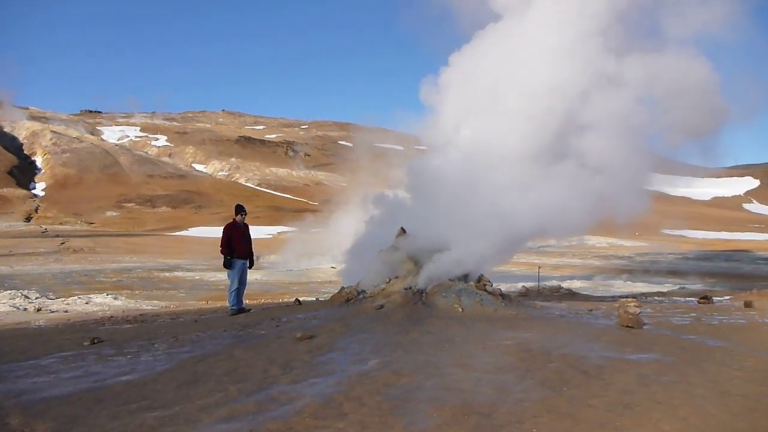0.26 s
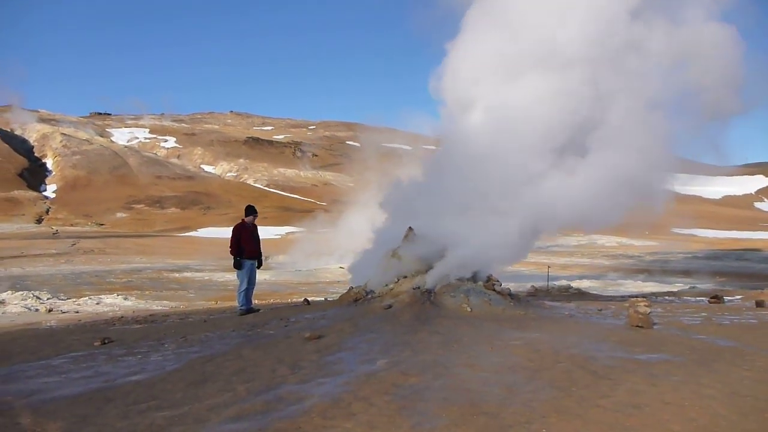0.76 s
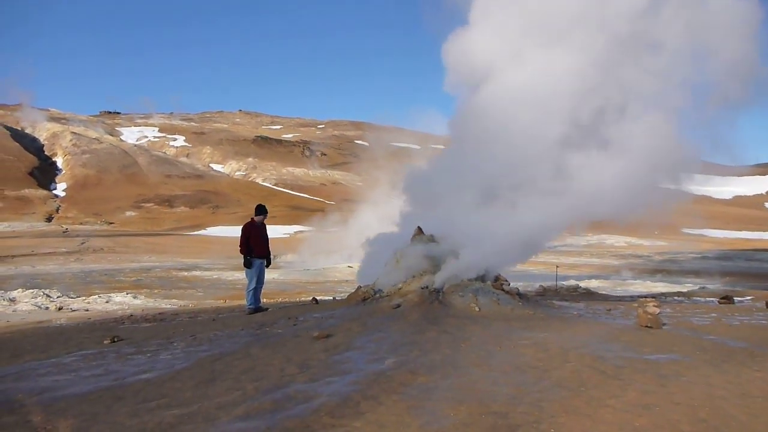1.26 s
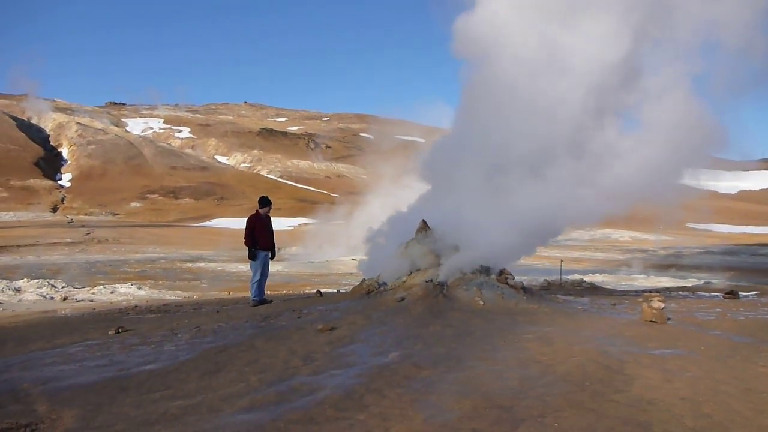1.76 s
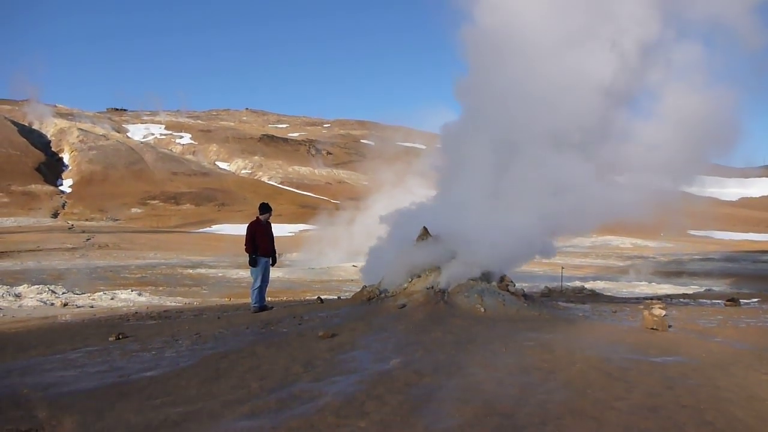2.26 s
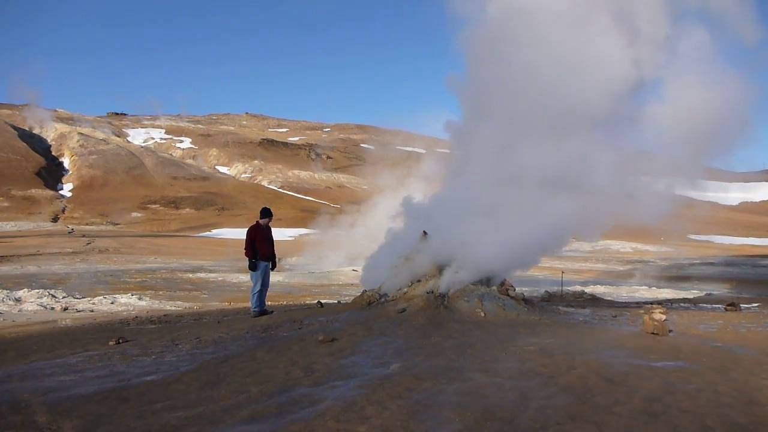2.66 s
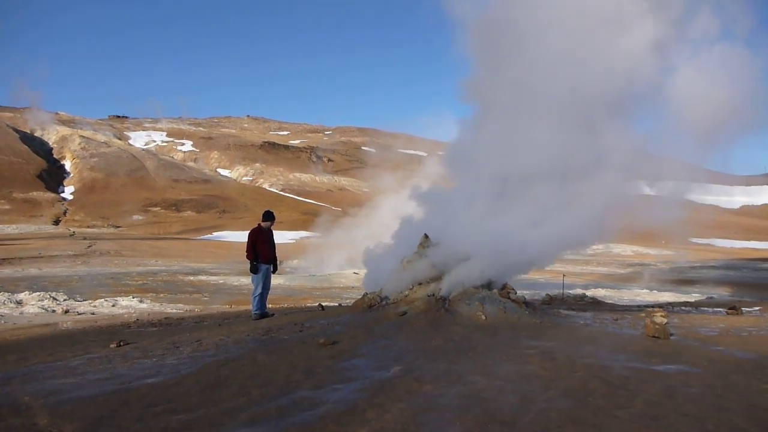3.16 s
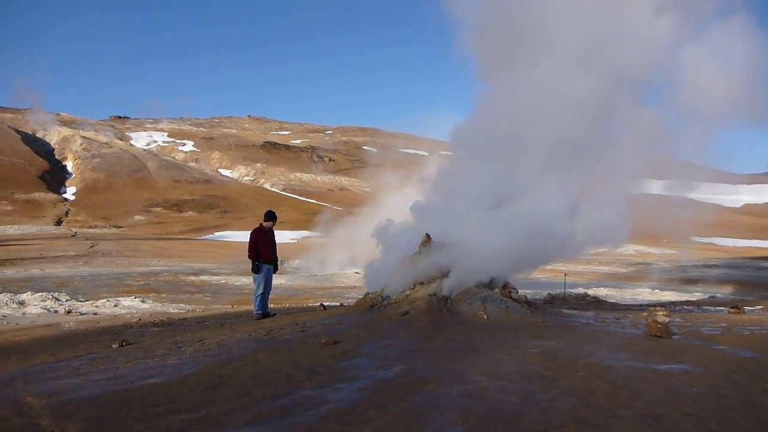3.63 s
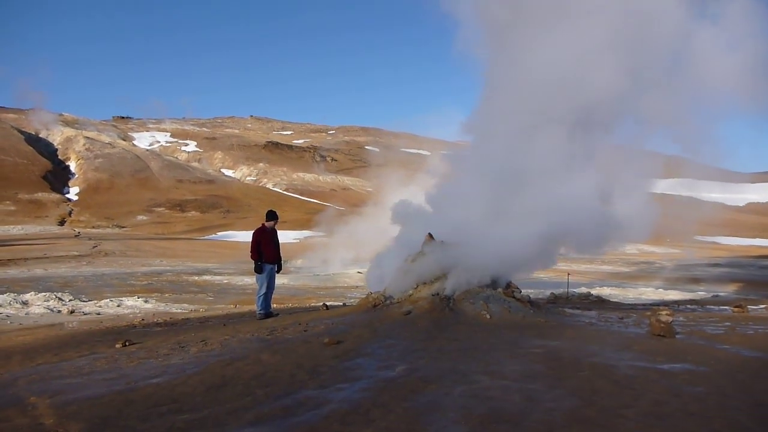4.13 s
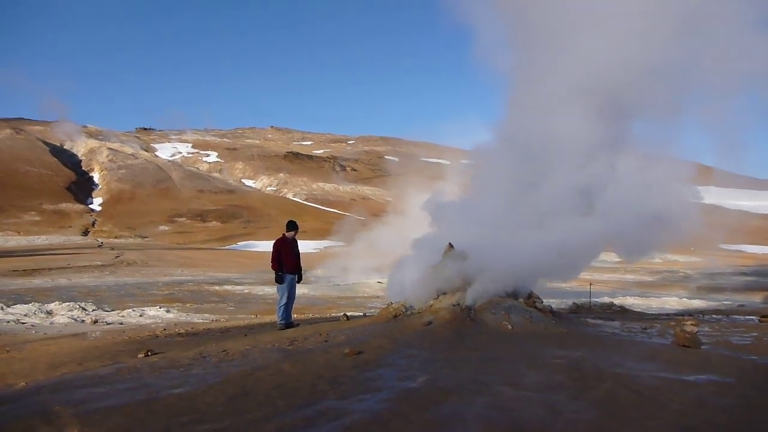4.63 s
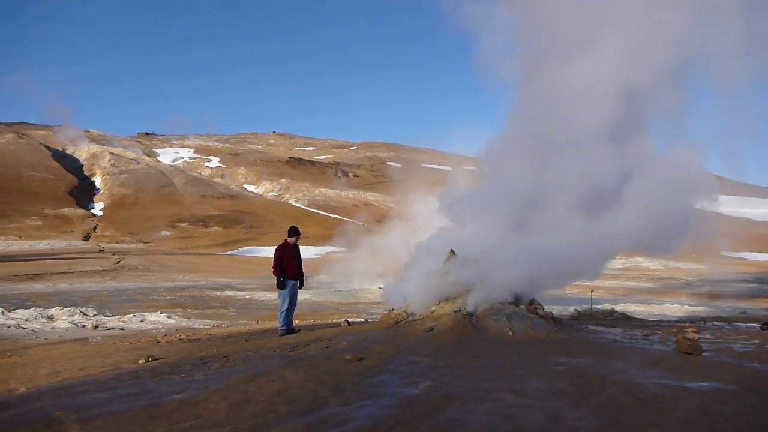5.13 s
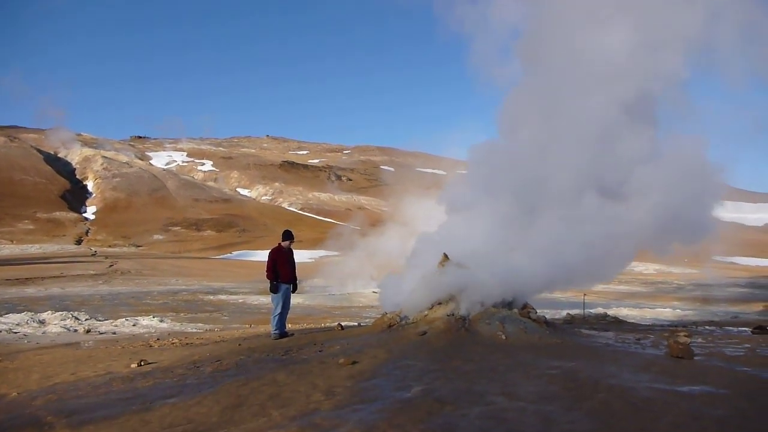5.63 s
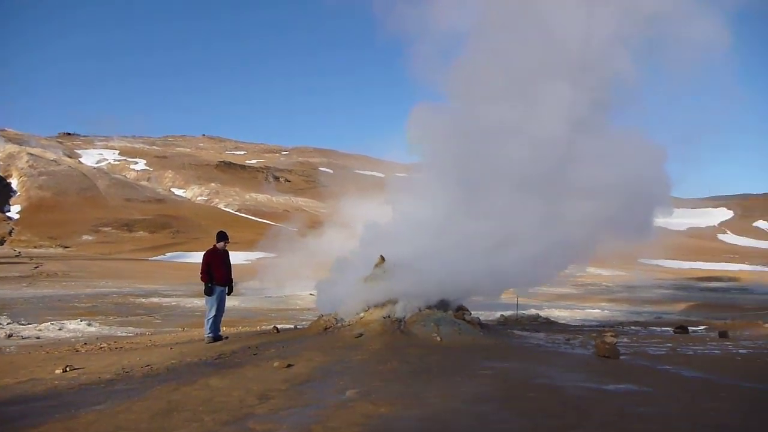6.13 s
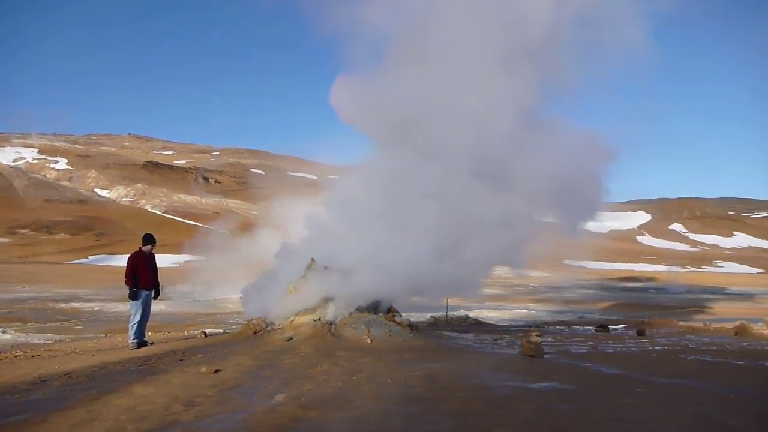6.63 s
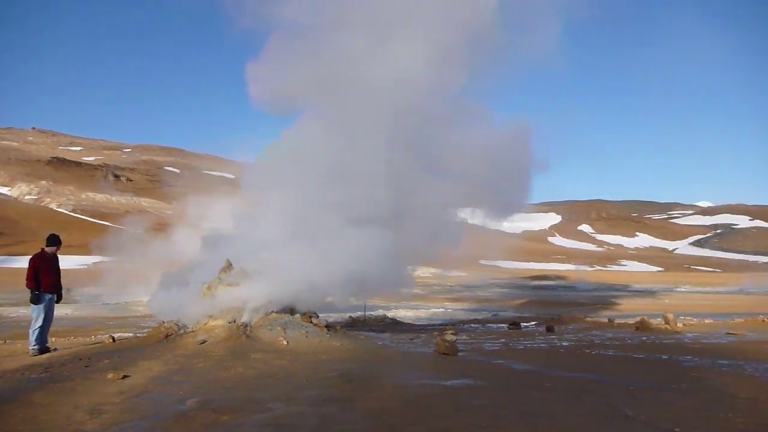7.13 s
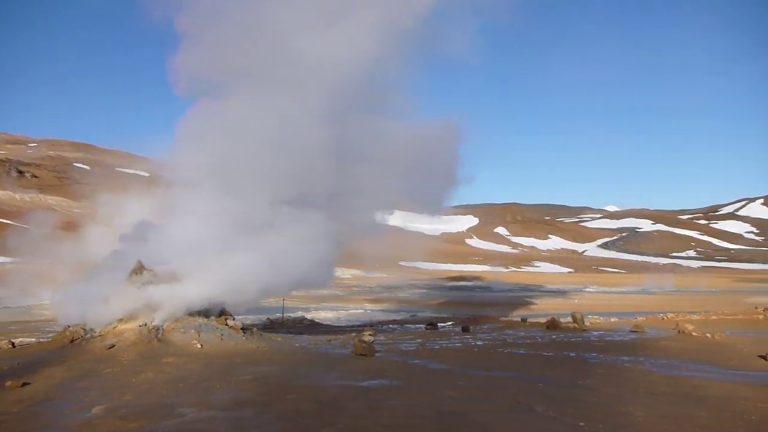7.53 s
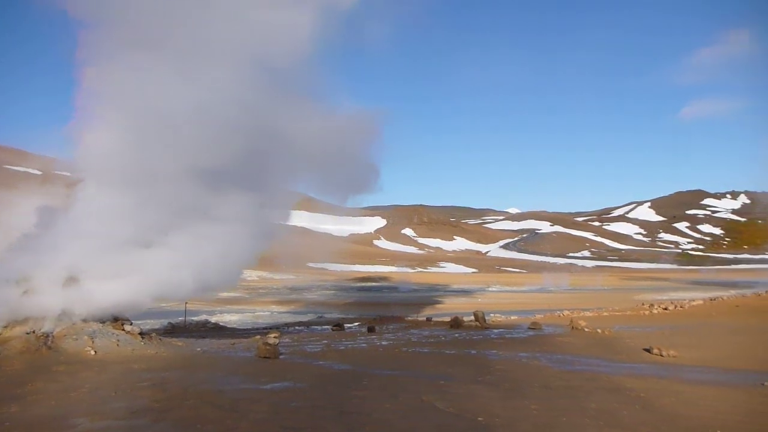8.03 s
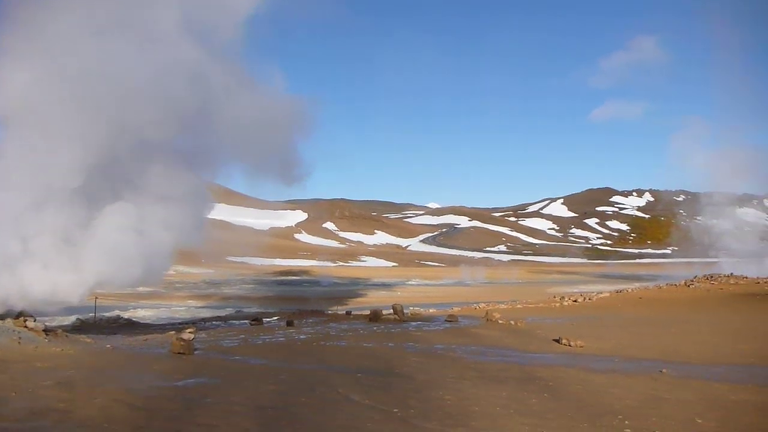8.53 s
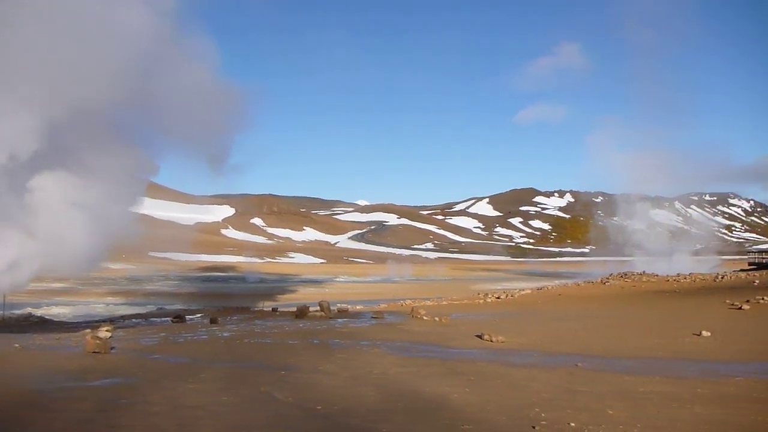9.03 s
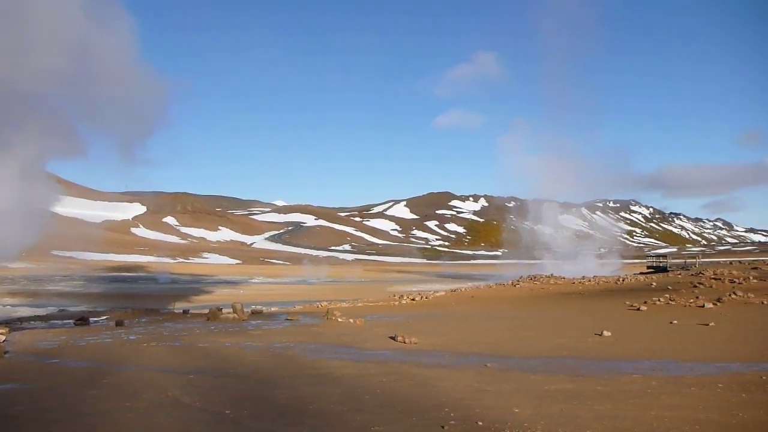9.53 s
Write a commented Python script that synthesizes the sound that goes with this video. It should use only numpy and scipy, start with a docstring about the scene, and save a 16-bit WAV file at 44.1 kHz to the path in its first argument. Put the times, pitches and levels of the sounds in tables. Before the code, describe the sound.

Steam roars steadily from a heap of stones in an open field, some metres from a hand-held microphone. The rushing hiss has a hollow body and swells faintly now and then. A tiny whistle sounds just after the start. In the second half the hiss shifts slightly in tone as the microphone turns away, and there is one small handling tick. Nothing echoes.

```python
"""Steam vent in an open field

Steam roars steadily from a heap of stones, some metres from a hand-held camera; nothing echoes.
The turbulent jet hisses, whistles once, and rings the hollow under the heap and its narrow throat.
Late on the camera turns away, which recolours the treble, and its body ticks once in the hand."""
import sys
import numpy as np
from scipy import signal
from scipy.fft import rfft, irfft
from scipy.io import wavfile
from scipy.ndimage import uniform_filter1d

SR = 44100
rng = np.random.default_rng(int(sys.argv[2]) if len(sys.argv) > 2 else 0)


def put_to_file(sound):
    """Save the sound as 16-bit audio at rate SR, in the file named by the first command-line argument."""
    columns = np.atleast_2d(sound).T  # one column per channel
    safe = np.clip(columns, -1, 1)
    whole_steps = np.round(safe * 32767)
    wavfile.write(sys.argv[1], SR, whole_steps.astype(np.int16))


N = 431298
TIME_S = np.arange(N) / SR
FREQ_HZ = np.fft.rfftfreq(N, 1 / SR)


def undb(db):
    """Decibels to gain."""
    return 10 ** (np.asarray(db) / 20)


def colour(points, hz):
    """Gain at hz of (frequency [Hz], level [dB]) points joined on a log-frequency axis."""
    points_hz, points_db = np.transpose(points)
    return undb(np.interp(np.log(hz + 1e-9), np.log(points_hz), points_db))


def resonance(centre_hz, width_hz):
    """Gain spectrum of a flat-topped, steep-sided resonance."""
    detune = (FREQ_HZ ** 2 - centre_hz ** 2) / (FREQ_HZ * width_hz + 1e-9)
    return 1 / np.hypot(1, detune ** 2)


def turbulence(spectrum, steady_s):
    """Shaped noise, rms held near 1 over spans of steady_s."""
    noise = irfft(rfft(rng.standard_normal(N)) * spectrum, N)
    return noise / np.sqrt(uniform_filter1d(noise ** 2, int(steady_s * SR)))


def wander(rate_hz):
    """Random values at rate_hz, linearly joined; zero mean, unit spread."""
    drift = np.interp(TIME_S * rate_hz, np.arange(N), rng.standard_normal(N))
    return (drift - drift.mean()) / drift.std()


# Mixing noise of the free jet: (frequency [Hz], relative density [dB])
JET_SPECTRUM = [(30, -37), (60, -22.5), (110, -3), (155, 1.5), (325, -1), (415, -7.5), (485, -1.5),
                (860, 1.5), (1120, -1.5), (1380, 0.3), (1620, -2.5), (1920, -3), (2620, -7), (2800, -13.5),
                (3300, -16), (4200, -19.5), (5800, -33), (7000, -45.5), (7600, -57.5)]


def vent(surge_rate_hz=5, steady_s=0.2):
    """Constant flow with small random surges: the jet and the two resonances it drives."""
    jet = colour(JET_SPECTRUM, FREQ_HZ)
    hollow = resonance(centre_hz=238, width_hz=144)
    throat = resonance(centre_hz=592, width_hz=221)
    turn_steps = bearing(TIME_S)

    def flow(spectrum, level_db, surge_db, db_per_step):
        db = level_db + surge_db * wander(surge_rate_hz) + db_per_step * turn_steps
        return undb(db) * turbulence(spectrum, steady_s)

    return (flow(jet, level_db=-26.5, surge_db=0.22, db_per_step=-0.12)
            + flow(hollow, level_db=-28.6, surge_db=0.14, db_per_step=0.05)
            + flow(throat, level_db=-29.5, surge_db=0.4, db_per_step=-0.22))


def bell(peak_s, half_s):
    """Gaussian envelope, down to 1/e at half_s from its peak."""
    return np.exp(-((TIME_S - peak_s) / half_s) ** 2)


# Edge tone: (time [s], frequency [Hz], half length [s], level [dB])
WHISTLES = [(0.227, 978, 0.021, -23.5)]


def whistles():
    """Steam catches on an edge of the mouth and sings for an instant."""
    return sum(undb(db) * bell(peak_s, half_s) * np.sin(2 * np.pi * hz * TIME_S)
               for peak_s, hz, half_s, db in WHISTLES)


# Resonant swells: (time [s], centre [Hz], width [Hz], half length [s], level [dB])
SWELLS = [ (0.68, 622, 30, 0.098, -35), (1.6, 256, 45, 0.17, -31.5), (2.92, 595, 65, 0.13, -29.5),
          (3.0, 1500, 700, 0.4, -40), (3.72, 560, 35, 0.08, -35), (5.552, 242, 40, 0.13, -34),
          (6.253, 246, 50, 0.14, -33.5), (7.02, 562, 24, 0.22, -31.5), (8.0, 600, 40, 0.28, -33),
          (8.12, 235, 40, 0.22, -33), (8.12, 1830, 160, 0.22, -44), (9.45, 274, 46, 0.41, -32), ]


def swells(steady_s=0.086):
    """The flow locks on to a resonance, which hoots or rasps for a few tenths of a second."""
    return sum(undb(db) * bell(peak_s, half_s) * turbulence(resonance(centre_hz, width_hz), steady_s)
               for peak_s, centre_hz, width_hz, half_s, db in SWELLS)


# Camera turn: (time [s], bearing [steps])
TURN = [(0, 0), (5.45, 0), (5.9, .45), (6.35, 1), (6.92, 2), (7.62, 3), (8.25, 4), (8.75, 4.4), (9.15, 4.8),
        (9.55, 5)]


def bearing(times_s):
    """Camera bearing in steps: 0 facing the vent, 5 facing away."""
    return np.interp(times_s, *np.transpose(TURN))


# Camera body response at bearings 0 to 5: (frequency [Hz], gain [dB])
FACING = [(900, 1), (1150, 1.5), (1950, 0.67), (2250, -6.5), (2600, -4.5), (3200, -1.6), (3550, 5),
          (3920, 2.5), (4380, 2.5), (4740, -6.5), (5280, -7.5), (5650, 1.5), (5950, 2), (6300, 0),
          (7000, -1)]
ASKEW = [(900, 1.4), (1150, .8), (1800, 2.5), (2250, -3.5), (2550, -4.5), (3250, -4.5), (3500, 2),
         (3800, 1.2), (4380, 3), (4680, 1), (4980, -2.5), (5320, -7), (5700, -1.6), (6300, -2.5), (6750, 0)]
OBLIQUE = [(900, .9), (1150, 0), (1900, 3.8), (2300, -1.3), (2650, .5), (3150, -2), (3440, -7), (3720, -.7),
           (4350, 5.8), (4570, .8), (4880, 2.2), (5400, -1.3), (6000, -.3), (6900, -.3), (7300, -2.5)]
SIDE_ON = [(900, 1), (1150, -0.8), (1920, 4.5), (2150, 3), (2520, .8), (3180, 4.5), (3580, -3.5),
           (3980, -2.5), (4400, -1.5), (4750, 2.5), (5050, 3.6), (5500, 4), (6000, 5), (6300, -.2),
           (7000, -2)]
OBLIQUE_REAR = [(900, 1), (1150, -1.5), (1830, 4.8), (2270, 2.8), (2630, -1), (3060, 5.5), (3700, -4.3),
                (4220, -5.6), (4570, -.8), (5000, 1.5), (5480, 3.7), (5950, 1), (6290, -4.3), (6750, 1),
                (7350, -3.5)]
AWAY = [(900, 1.3), (1180, 0), (1830, 1), (2320, 3.6), (2560, 1.7), (3270, 5.3), (3780, -.3), (4140, -1.7),
        (4400, 1), (4780, 1), (5260, 5), (5640, -3.7), (6200, -3.6), (6800, -4.2), (7350, -6)]


def diffraction(sound, frame_samples=1024):
    """Sound bends round the camera body; peaks and dips slide as the bearing changes."""
    hz, times_s, frames = signal.stft(sound, SR, nperseg=frame_samples)
    responses = np.array([FACING, ASKEW, OBLIQUE, SIDE_ON, OBLIQUE_REAR, AWAY])
    offset_steps = bearing(times_s)[:, None] - np.arange(len(responses))
    weights = np.maximum(1 - abs(offset_steps), 0)  # blend the two nearest bearings
    blended = np.tensordot(weights, responses, 1)
    gains = np.transpose([colour(points, hz) for points in blended])
    return signal.istft(frames * gains, SR, nperseg=frame_samples)[1][:N]


# Grip slip: (time [s], level [dB])
TICKS = [(6.7158, -12.7)]
# Camera body modes: (frequency [Hz], relative level [dB], T60 [s])
BODY_MODES = [(2340, -3, 0.016), (2580, -3.5, 0.012), (3130, -8, 0.012), (3800, -12, 0.012),
              (4400, -20, 0.009), (6100, -24, 0.006)]


def ticks(crack_db=-15, crack_s=0.0013, contact_s=0.0005):
    """The plastic body slips in the grip: a short crack, and its modes ring briefly."""
    out = np.zeros(N)
    grit = turbulence(resonance(centre_hz=2900, width_hz=1300), steady_s=10 * crack_s)
    for start_s, db in TICKS:
        age_s = np.maximum(TIME_S - start_s, 0)
        ring = sum(undb(mode_db - 60 * age_s / t60_s) * np.sin(2 * np.pi * hz * age_s)
                   for hz, mode_db, t60_s in BODY_MODES)
        crack = undb(crack_db) * grit * np.exp(-age_s / crack_s)
        onset = 1 - np.exp(-(age_s / contact_s) ** 2)  # rounded by the soft grip
        out += undb(db) * (ring + crack) * onset
    return out


def scene():
    """Mono mix: the vent arrives through the air, the tick straight through the camera body."""
    steam = vent() + whistles() + swells()
    return (diffraction(steam) + ticks())[None]


def record(dry, low_cut_hz=38, notch_hz=2890, notch_width_hz=230, high_cut_hz=7300):
    """The camera cuts the deepest bass, one narrow treble band and the top."""
    x = signal.sosfilt(signal.butter(2, low_cut_hz, "high", fs=SR, output="sos"), dry)
    x = signal.lfilter(*signal.iirnotch(notch_hz, notch_hz / notch_width_hz, fs=SR), x)
    return signal.sosfilt(signal.ellip(8, 0.2, 70, high_cut_hz, fs=SR, output="sos"), x)


dry = scene()
out = record(dry)
put_to_file(out)
```